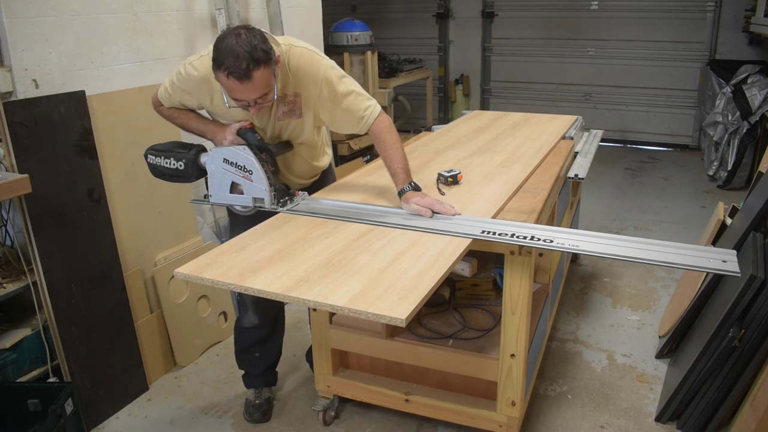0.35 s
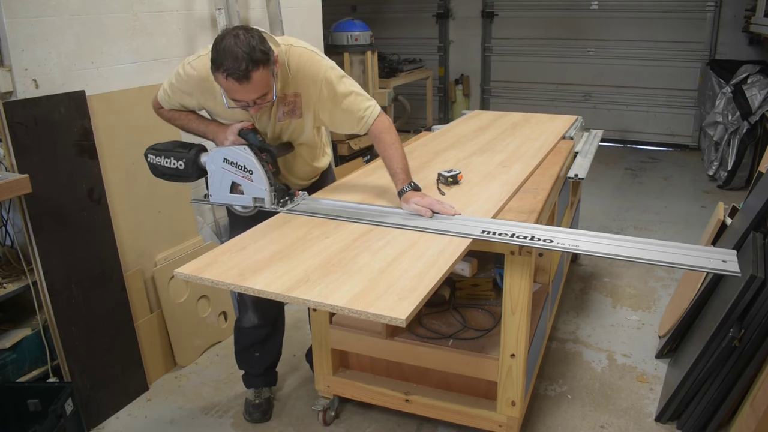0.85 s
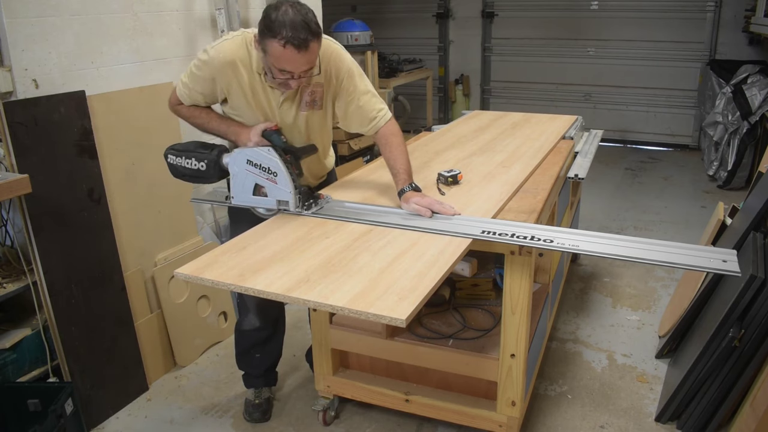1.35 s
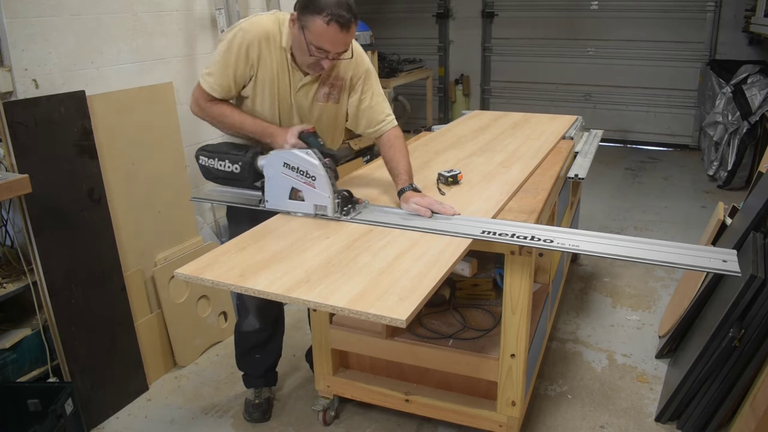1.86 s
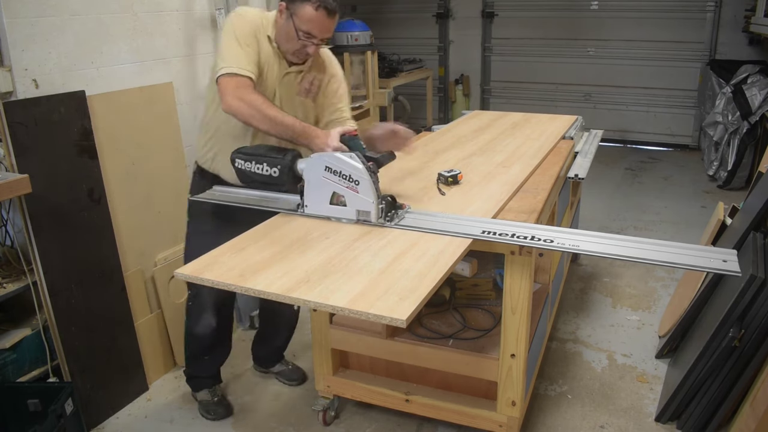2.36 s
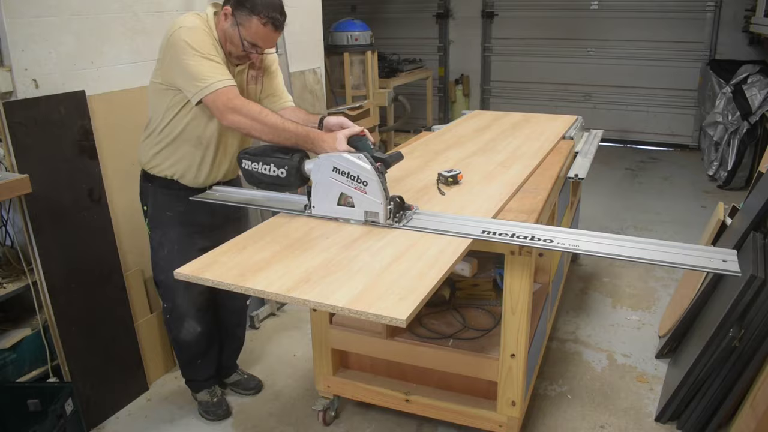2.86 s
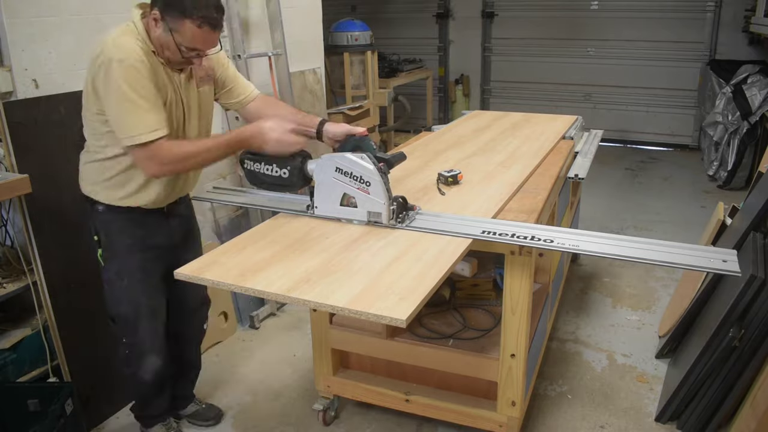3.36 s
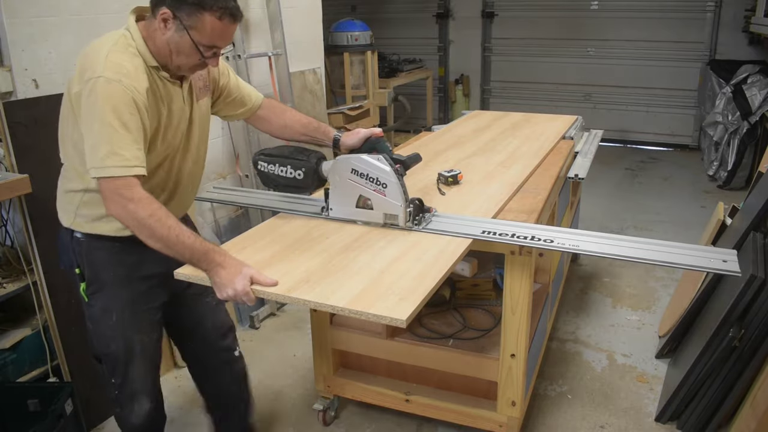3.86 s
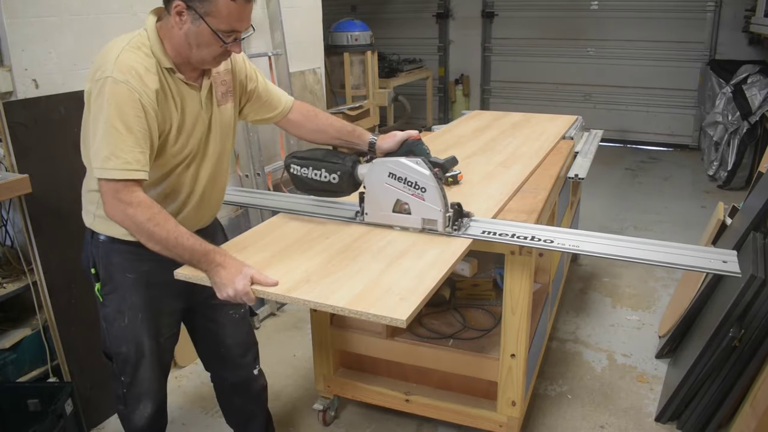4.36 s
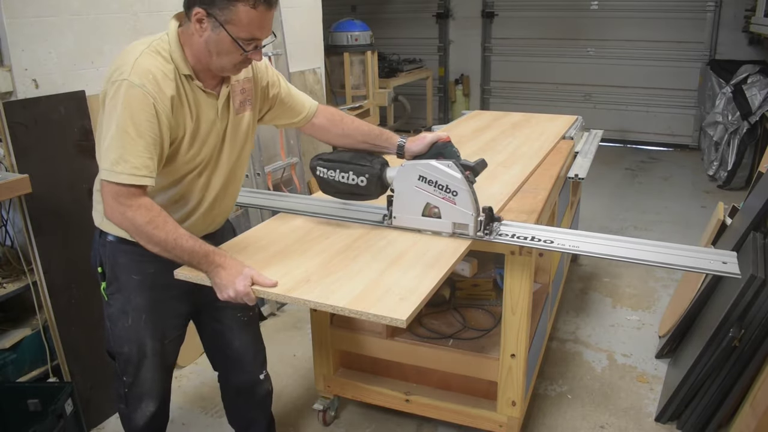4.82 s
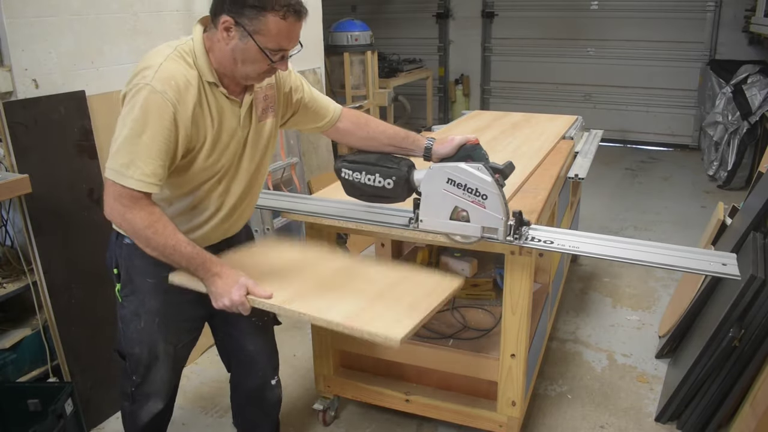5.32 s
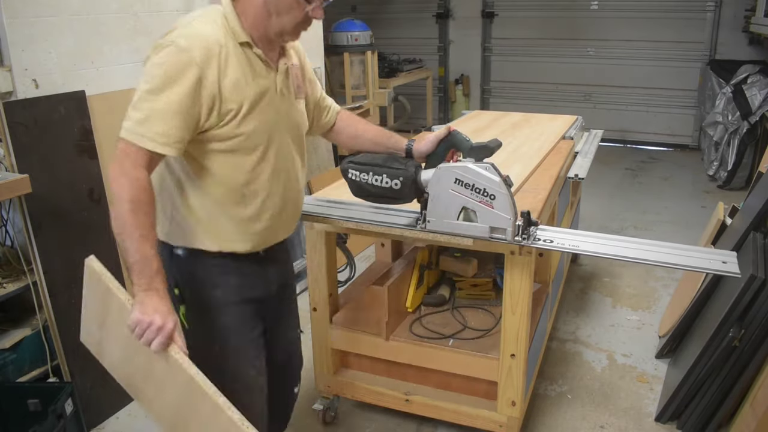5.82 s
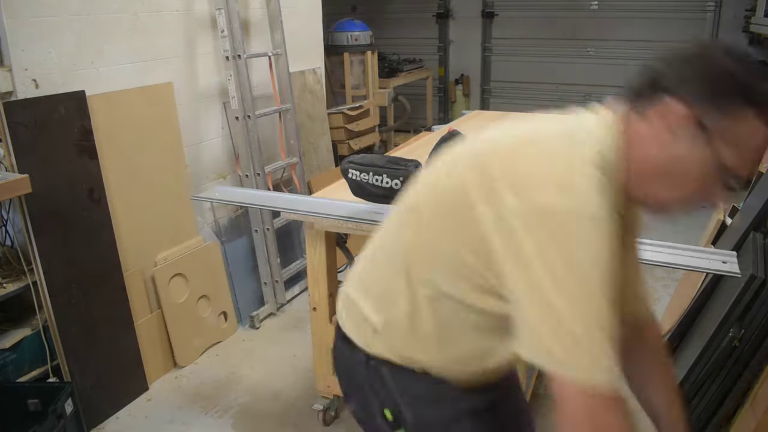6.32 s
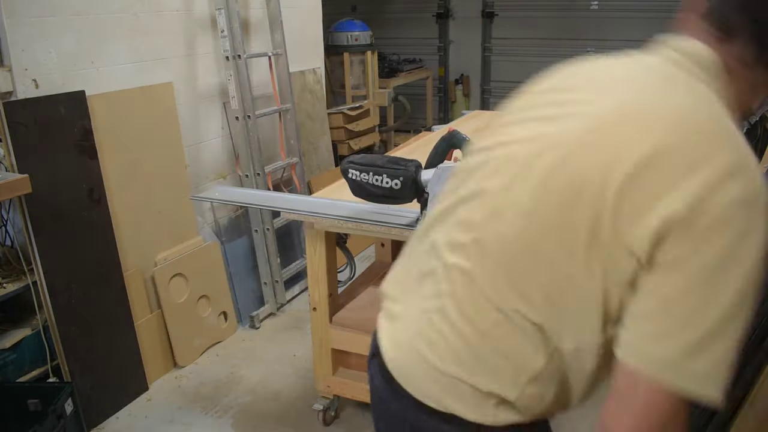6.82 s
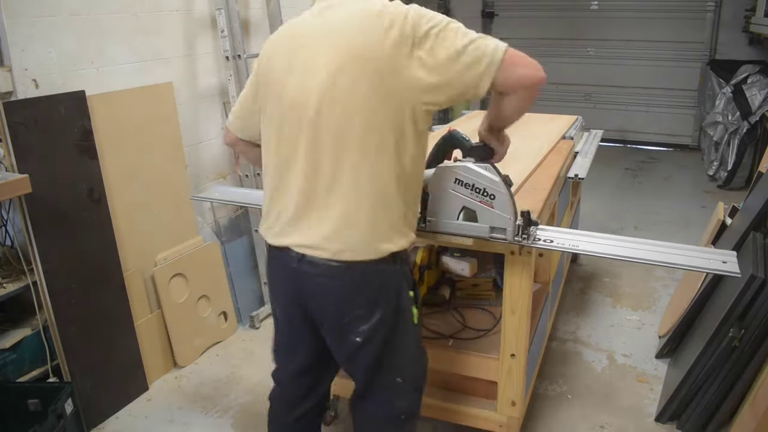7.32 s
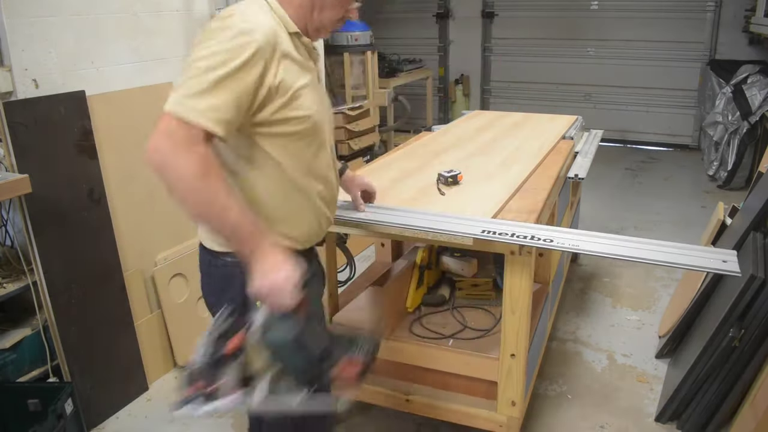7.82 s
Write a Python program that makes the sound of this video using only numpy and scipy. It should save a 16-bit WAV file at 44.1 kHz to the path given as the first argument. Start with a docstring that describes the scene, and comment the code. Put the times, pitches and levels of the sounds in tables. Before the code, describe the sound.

Loud, steady electric saw whine becomes a rougher, lower growl as teeth enter wood. A quick dip and recovery interrupts the cut; at the end the pitch rises again before a fast braked fall. A metallic ring lingers in the quiet garage workshop, a board smacks the floor, then cloth rustles, light ticks and hollow tool rattles sound softly. Centred pickup with little reverberation.

```python
"""A saw whines and roars as it runs free, then dips into a wooden panel and growls lower as it cuts.
It is braked and restarted once, finishes the cut and brakes to a stop; its blade rings on, the offcut meets the floor.
Then feet, clothes and tools scuff and tick in a quiet workshop. Whine, ring and knocks are made of sine tones;
roar, scuffs, ticks and air are shaped noise; small clacks are damped tones struck a few times.
Both channels carry the same sound."""
import sys
import numpy as np
from scipy import signal
from scipy.io import wavfile
from scipy.ndimage import uniform_filter1d

SR = 44100
rng = np.random.default_rng(int(sys.argv[2]) if len(sys.argv) > 2 else 0)


def wav_record(signal):
    """Record a signal, one row per channel, as 16-bit PCM in the file named by sys.argv[1]."""
    frames = np.transpose(np.atleast_2d(signal))
    bounded = np.clip(frames, -1, 1)
    # unit amplitude maps onto the largest positive 16-bit level
    quanta = np.round(bounded * 32767).astype(np.int16)
    wavfile.write(sys.argv[1], SR, quanta)


def nominal_scale(level):
    """Amplitude ratio for a level in decibels (scalar or array-like)."""
    x = np.asarray(level, float) / 20
    return 10 ** x


N = 360738

# motor speed while the trigger is held; the cut drags it down: time_s, armature_turns_per_s
SPEED = [(0.0, 1567), (0.3, 1573.5), (0.75, 1577), (1.36, 1577), (1.44, 1535), (1.58, 1396), (1.78, 1304),
         (1.98, 1222), (2.07, 1258), (2.27, 1293), (2.37, 1357), (2.57, 1414), (2.66, 1410), (3.06, 1520),
         (3.2, 1519), (3.36, 1449), (3.55, 1465), (3.65, 1418), (3.8, 1395), (3.95, 1328), (4.14, 1305),
         (4.24, 1321), (4.95, 1351), (5.15, 1378), (5.24, 1416), (5.33, 1494), (5.43, 1542), (5.65, 1558)]
# trigger let go, then pressed again: off_s, on_s
RELEASES = [(2.665, 2.815), (5.65, 9)]
BRAKE_HZ_PER_S, RESTART_S = 5700, .062  # speed lost per second of braking; time to win it back
LOAD_FROM_HZ, STALL_HZ = 1510, 1348  # armature speed below which load begins, and that of a full cut
BLADE_RATIO = .14983  # blade turns per armature turn
PLUNGE_S, WOOD_S, THROUGH_S = .23, 1.42, 5.31  # blade lowered, meets the wood, cuts through

# armature and gear tones: armature_multiple, free_level_db, full_cut_level_db
GEAR_TONES = [(1, -46.5, -67), (2, -57, -65), (3, -66, -75), (4, -45.5, -59), (6, -60, -68),
              (6.98, -72, -65), (7, -60, -52), (8, -55, -60), (9.98, -58, -70), (10, -42, -56)]
# the blade throbs in its slot: blade_multiple, light_cut_level_db, full_cut_level_db
THROB = [(2, -72.5, -84.5), (2.5, -98.5, -76.5), (3, -83.5, -77.5), (4, -76, -82.5), (5, -68, -74),
         (6, -86.5, -68), (7, -59, -74.5), (8, -75, -56.5), (9, -92, -72), (11, -82, -68.5), (12, -60, -80)]
# tooth tones: blade_multiple, level_over_roar_db, gain_while_speed_sags_db
TEETH = [(19, -27, 2), (21, -28, 6), (24, -30, 5), (33, -26, 5), (37, -27, 0), (39, -29, 0), (42, -23, -3)]
# blade resonances that lift the tooth tones: pitch_hz, width_hz, cut_start_lift_db, cut_end_lift_db
BITE = [(4150, 130, 17, -6), (7470, 130, 12, 12), (8000, 300, 14, 14), (8550, 300, 13, 12)]
# tones are lifted or sunk at these pitches; the last row is the upper edge of the sound:
# pitch_hz, width_hz, change_db
PASSING = [(1235, 50, 4), (1412, 20, 5), (1455, 30, -4), (5650, 250, 3), (1517, 14, 3), (1545, 16, 1),
           (1577.5, 4, 4.5), (1125, 70, -10), (1597, 14, -7), (385, 25, 7), (478, 16, -10), (2215, 40, 6),
           (2830, 40, 8), (3080, 70, 5), (1571.5, 2.5, -7), (3133, 14, 10), (6070, 90, -7), (6200, 110, 6),
           (6294, 20, -10), (8560, 250, 10), (9330, 160, 4), (9463, 50, 8), (10900, 150, 9),
           (11620, 120, 4), (12430, 150, 9), (12605, 110, 14), (14180, 200, 1), (14550, 250, -5),
           (15550, 300, 7), (15705, 50, 10), (15775, 60, -28)]
# coil whine while braking: armature_multiple, level_db
BRAKE_TONES = [(5.5, -49.5), (6.2, -61), (7, -57), (8, -62), (9.8, -57), (4.7, -59), (4, -60), (3.4, -61),
               (2.6, -64), (2.2, -64), (2, -60), (1.8, -63), (1.5, -66), (1, -66)]
# how strongly the brake tones sound: time_s, change_db
BRAKE_FORCE = [(2.9, -16), (5.6, 0)]
# the housing lifts the brake and restart tones here: pitch_hz, width_hz, lift_db
BRAKE_SING = [(7400, 900, 11)]
# gear tones while the motor spins up: armature_multiple, level_db
RESTART_TONES = [(7, -56), (7.6, -58), (8, -57), (4, -63), (10, -58)]
WOBBLE_DB, WOBBLE_CUT_DB = -71, -75  # blade imbalance, free and in a full cut
STRAIN_DB, STRAIN_HZ_PER_S = 2, 500  # in the cut, tones swell as speed sags; full swell at this fall

# roar over time: time_s, roar_level_db, howl_over_roar_db
ROAR = [(0.0, -36, -25), (0.18, -38, -34), (1.38, -35, -27), (1.55, -37, -11), (1.82, -37.5, -10),
        (1.9, -37, -10), (2.14, -37.5, -12.5), (2.61, -37.5, -10.5), (4.04, -38.5, -11), (4.27, -39, -8),
        (5.29, -38.5, -5), (5.34, -37.5, -25), (5.74, -38.5, -9), (5.84, -34.5, -16), (5.91, -48, -22),
        (5.96, -64, -22), (6.04, -100, -30)]
# noise colour running free: pitch_hz, level_per_hz_db
FAN = [(530, -52), (900, -27), (1450, -14), (1560, -9), (2320, -11.5), (3930, -7), (5120, -14), (6130, -8),
       (9900, -11), (11000, -7), (12300, -7), (13500, -10), (15800, -12)]
# noise colour of teeth in wood: pitch_hz, level_per_hz_db
CUT = [(530, -60), (900, -23.5), (1300, -15.5), (1470, -12), (1580, -5), (2520, -8.5), (3620, -0.5),
       (3930, -6), (4760, -6.5), (6000, -6.5), (7000, -1.5), (8370, -2.5), (10000, -4.5), (15800, -7)]
# blade and housing shaken by air and teeth: pitch_hz, width_hz, free_lift_db, cut_lift_db
SHAKEN = [(1820, 35, 2, 8), (1935, 50, 5, 2), (2200, 50, 3, 3), (2800, 80, 4, 3), (5380, 45, 1, 6),
          (5800, 60, 3, 3), (7440, 40, 5, 14), (7600, 60, 4, 8), (8140, 50, 3, 7), (8590, 45, 5, 10),
          (9260, 35, 5, 6), (10700, 110, 8, 5), (10900, 110, 6, 10), (14200, 60, 0, 9), (3020, 40, 4, 4),
          (3855, 45, 7, 0), (6170, 60, 3, 4), (8420, 40, 3, 7), (10230, 40, 3, 5), (11500, 50, 3, 4),
          (12300, 60, 2, 5), (13000, 50, 3, 4), (15350, 60, 3, 6)]
# part of the hiss altered by braking (a minus loss is a gain): pitch_hz, width_hz, loss_db
BRAKE_HISS = [(13500, 910, -0.5)]
# loudest blade modes: pitch_hz, width_hz, cut_start_level_db, cut_end_level_db
HOWL = [(3828, 48, -6, 2), (3900, 40, -4, -2), (3952, 45, -2, 1), (4040, 40, -1, -5), (4105, 60, 2, -3),
        (4220, 50, -5, -6)]
# noise colour of the low body rumble: pitch_hz, level_per_hz_db
RUMBLE = [(18, -42), (30, -2.5), (162, -32), (199, -13), (398, -6.5), (431, -14), (610, -11.5), (692, -7.5),
          (1300, -5.5), (1690, -22.5), (2860, -120)]
# housing buzz: pitch_hz, width_hz, free_lift_db, braked_lift_db
BUZZ = [(345, 28, 5, 25), (500, 30, 5, 33)]
CHOP, CHOP_BRAKED = 0.058, 0.098  # depth of the throb at each blade turn; braking adds the second
# rumble level against the roar, which it trails by the lag; the cut lowers it a little, the brake raises it
RUMBLE_DB, RUMBLE_CUT_DB, RUMBLE_BRAKE_DB, RUMBLE_LAG_S = -29, -2.5, 5, 0.053
SHUDDER_HZ, SHUDDER_DB = 750, 5  # below this armature speed the housing shudders

# the blade ringing on: pitch_hz, relative_level_db, fall_60db_s
RING = [(1820, -17, 0.59), (2130, -21, 1.14), (4780, -29, 1.6), (5845, 2.5, 1.05), (6530, -16, 0.73),
        (7790, -47, 5.0), (8300, -16, 0.75), (8500, -10, 0.47), (9000, -20, 0.38), (11400, -21, 0.46)]
RING_FROM_S, RING_TO_S, RING_DB = 5.83, 6.487, -45  # the level is added to every ringing tone

# ringing tones of the wooden panel: pitch_hz, relative_level_db, fall_90db_s
PANEL = [(158, -24, 0.8), (163, -10, 0.15), (218, -9, 0.086), (410, 0.5, 0.046), (535, -9, 0.11),
         (750, -6, 0.077), (645, -9.5, 0.18), (830, -10.5, 0.18), (1003, 6, 0.043), (1166, 2.5, 0.036),
         (1310, -6, 0.15), (1330, -9, 0.11), (1390, 2, 0.1), (1513, -11.5, 0.21), (1740, 0.5, 0.061),
         (1997, 2.5, 0.11), (2060, -5, 0.15), (2480, -7.5, 0.14), (2660, -17, .1), (2890, -23, 0.091),
         (3240, -9, .12), (3450, -10.5, 0.17), (3500, -13, 0.088), (4100, -16, .1), (4440, -16, .12),
         (5340, -11, .12)]
# the offcut drops free, later meets the floor: start_s, blow_db, hardness_hz, lowest_ringing_hz
BLOWS = [(5.315, -45, 750, 150), (5.383, -49, 1000, 220), (6.5623, -35, 4980, 60),
         (6.565, -39.5, 2960, 280), (6.575, -37.5, 4000, 280)]
SOFT_RISE_S = .005  # rise of a blow of hardness 1 kHz; harder ones rise much faster
CLATTER_DB, CLATTER_S, CLATTER_HZ = -3.5, 0.014, 2400  # dull burst in every blow: level, decay, top pitch

# small hard contacts: start_s, bright_level_db, dull_level_db
TICKS = [(2.83, -39, -52), (6.039, -62, -79), (6.085, -58, -75), (6.111, -71.5, -65), (6.153, -75, -58.5),
         (6.218, -67.5, -68), (6.352, -77, -62.5), (6.484, -65.5, -58), (6.55, -64, -56),
         (6.555, -33.5, -46), (6.649, -40, -53), (6.949, -77, -62), (7.111, -68, -68), (7.18, -60, -64.5),
         (7.249, -58.5, -54.5), (7.52, -67, -87), (7.647, -69, -68), (7.785, -66, -67), (7.869, -76, -67),
         (7.96, -65.5, -80), (8.014, -66.5, -72)]
FAINT_PER_S, FAINT_DB, FAINT_FROM_S = 3, -80, 6.1  # stray ticks: how often, lowest level, first time
# small hollow parts knock and rattle: start_s, level_db, pitch_hz, rattle_s
CLACKS = [(6.8, -70, 2200, .02), (6.828, -69.5, 1900, .03), (6.907, -72, 1800, .01),
          (7.005, -67, 1570, .03), (7.471, -64, 2180, .012), (7.533, -67, 2150, .02),
          (7.536, -64, 3270, .01), (7.629, -70, 880, .01), (7.79, -73, 2500, .015),
          (7.873, -56, 1730, .012), (7.886, -59, 755, .01), (7.915, -74, 1010, .015),
          (7.95, -56, 2290, .025), (8.014, -62, 3870, .008), (8.016, -69, 2100, .012),
          (8.135, -61, 695, .008)]
CLACK_CYCLES, RATTLE_PER_S = 6, 210  # cycles for a ring to fall to 37 %; contacts per second
# rubbing strokes: start_s, bright_level_db, dull_level_db, length_s
SCUFFS = [(6.072, -66, -93, 0.019), (6.485, -61, -64, 0.049), (6.557, -46.5, -48, 0.024),
          (6.887, -91, -81, 0.05), (6.975, -71.5, -72, 0.027), (7.114, -62, -66.5, 0.033),
          (7.248, -55.5, -68.5, 0.049), (7.453, -81, -69, 0.025), (7.538, -76, -79, 0.091),
          (7.688, -76, -81, 0.042), (7.78, -56.5, -70, 0.027), (7.874, -65.5, -74, 0.054),
          (7.937, -82.5, -85, 0.077), (8.129, -61.5, -65, 0.011)]
# rustle of clothes: time_s, level_db
RUSTLE = [(5.95, -68), (6.31, -81.5), (8.18, -87.5)]
# colour of the bright rubbing noise: pitch_hz, level_per_hz_db
BRIGHT = [(1180, -38), (2000, -7.5), (3360, -13), (4140, -10), (4470, -11), (8050, -1.5), (9240, -9),
          (13000, -15), (15800, -19.5)]
# colour of the dull rubbing noise: pitch_hz, level_per_hz_db
DULL = [(180, -39), (300, 7), (704, -0.5), (1030, -0.5), (1120, -1.5), (1690, -3), (3500, -1),
        (4550, -72.5), (7700, -120)]
# colour of the quiet room's air: pitch_hz, level_per_hz_db
AIR = [(12, -36), (20, -8), (107, -2.5), (130, -7), (162, -3.5), (276, -14.5), (1470, -28.5), (1840, -24),
       (2430, -33), (3040, -29), (15800, -51)]
AIR_DB = -73.5
# how long the room echoes: pitch_hz, fall_60db_s
ROOM = [(150, 0.38), (1000, 0.16), (4000, 0.14), (12000, 0.12)]


def whine():
    """Sine tones locked to armature and blade turns; the brake sings roughly while the speed drops."""
    t = np.arange(N) / SR
    hz, load = uniform_filter1d(speed_at(t), 500), load_at(t)
    blade_hz = BLADE_RATIO * hz
    braking, roar_db = uniform_filter1d(braking_at(t), 600), curves(ROAR, t)[0]
    spinning_up = np.clip(np.gradient(hz, t) / 1500 - 1, 0, 1)
    shiver = (.0003 + .001 * load + .028 * braking + .016 * spinning_up) * drift(count=1, width=2)[0]
    turns = np.cumsum(hz * (1 + shiver)) / SR

    # driven tones drop out just after the trigger is let go, and at low speed
    driven = (1 - uniform_filter1d(braking_at(t - .032), 1600)) * np.clip(hz / 250 - 4.2, 0, 1)
    sag = uniform_filter1d(-np.gradient(curves(SPEED, t)[0], t), 4000) / STRAIN_HZ_PER_S
    strain = np.sqrt(load) * np.clip(sag, -1, 1)
    strained = driven * nominal_scale(STRAIN_DB * strain)
    in_wood = between(t, WOOD_S, THROUGH_S)

    tones = []  # (multiple of armature turns, gain over time)
    for k, free_db, cut_db in GEAR_TONES:
        level_db = free_db + load * (cut_db - free_db) + passing_db(k * hz)
        tones.append((k, strained * nominal_scale(level_db)))
    for k, light_db, full_db in THROB:
        level_db = light_db + load * (full_db - light_db) + passing_db(k * blade_hz)
        tones.append((k * BLADE_RATIO, strained * (1 - braking) * in_wood * nominal_scale(level_db)))
    wobble_db = WOBBLE_DB + load * (WOBBLE_CUT_DB - WOBBLE_DB)
    tones.append((BLADE_RATIO, driven * between(t, PLUNGE_S, THROUGH_S) * nominal_scale(wobble_db)))

    # tooth tones swell where they cross a blade resonance
    done = done_at(t)
    bite = [(f, width, db + done * (end_db - db)) for f, width, db, end_db in BITE]
    for k, db, strain_db in TEETH:
        swell = np.sqrt(1 + in_wood * humps(bite, k * blade_hz))
        tones.append((k * BLADE_RATIO, driven * nominal_scale(roar_db + db + strain_db * strain) * swell))

    # each brake or restart tone is partly torn into hiss by a quick random gain
    torn_gains = [.7 * (1 + row) for row in drift(count=len(BRAKE_TONES), width=2)]
    brake_gain = braking * nominal_scale(curves(BRAKE_FORCE, t)[0]) * np.clip(hz / 500 - 1, 0, 1)
    restart_gain = spinning_up * np.clip(hz / 150 - 4.3, 0, 1)
    for rows, gain in ((BRAKE_TONES, brake_gain), (RESTART_TONES, restart_gain)):
        for (k, db), torn in zip(rows, torn_gains):
            sing = np.sqrt(1 + humps(BRAKE_SING, k * hz))
            tones.append((k, torn * gain * nominal_scale(db) * sing))

    flutter_db = 1.2 + 2.2 * load + 3 * braking  # cut and brake break the tones up
    out = np.zeros(N)
    for (k, gain), flutter in zip(tones, drift(count=len(tones), width=14)):
        sine = np.sin(2 * np.pi * (k * turns + rng.random()))
        out += np.sqrt(2) * gain * nominal_scale(flutter_db * flutter) * sine * (k * hz < 15780)
    return out


def roar():
    """Fan, gears and teeth as dense noise, chopped a little at each blade turn, with howl and body rumble."""
    t = np.arange(N) / SR
    roar_db, howl_db = curves(ROAR, t)
    depth = CHOP + CHOP_BRAKED * uniform_filter1d(braking_at(t - .08), 4000)
    blade_turns = BLADE_RATIO * np.cumsum(speed_at(t)) / SR
    chop = 1 + depth * np.sin(2 * np.pi * blade_turns)
    dense = chop * noise(roar_colour, size=2048, patchy_db=1.55)
    howl = nominal_scale(howl_db) * noise(howl_colour, size=1024, patchy_db=1.5)
    rumble_db = curves(ROAR, t - RUMBLE_LAG_S)[0] + RUMBLE_DB + RUMBLE_CUT_DB * load_at(t)
    rumble_db += RUMBLE_BRAKE_DB * uniform_filter1d(braking_at(t), 2000) + SHUDDER_DB * shudder_at(t)
    body = nominal_scale(rumble_db) * noise(rumble_colour, size=1024, patchy_db=2.0)
    return (t < ROAR[-1][0]) * (nominal_scale(roar_db) * (dense + howl) + body)


def roar_colour(hz, t):
    """Load turns fan noise into cutting noise; wood or load shakes the blade in a new way."""
    load = load_at(t)
    shake = np.where((t > WOOD_S) & (t < THROUGH_S), 1, load)
    peaks = humps([(f, width, free_db + shake * (cut_db - free_db)) for f, width, free_db, cut_db in SHAKEN], hz)
    loss_db = sum(db / (1 + (2 * (hz - f) / width) ** 4) for f, width, db in BRAKE_HISS)
    loss_db = uniform_filter1d(braking_at(t), 6) * loss_db
    return (1 - load) * read(FAN, hz) + load * read(CUT, hz) + 10 * np.log10(1 + peaks) - loss_db


def howl_colour(hz, t):
    """The howl slides to the lower blade modes as the cut goes on."""
    done = done_at(t)
    # halved here because 20 * log10 doubles it again
    modes = [(f, width, (db + done * (end_db - db)) / 2) for f, width, db, end_db in HOWL]
    return 20 * np.log10(humps(modes, hz))


def rumble_colour(hz, t):
    """The housing buzzes when free or braked; the bench shakes low under load."""
    load = load_at(t)
    braking = np.maximum(.7 * uniform_filter1d(braking_at(t), 20), shudder_at(t))
    modes = [(f, width, (1 - load) * free_db + braking * brake_db) for f, width, free_db, brake_db in BUZZ]
    return read(RUMBLE, hz) + 10 * np.log10(1 + humps(modes, hz)) - 18 * (1 - load) * (hz < 150)


def speed_at(t):
    """Armature turns per second: driven speed, less what the brake takes; a restart wins it back quickly."""
    driven = np.mean([curves(SPEED, t + c)[0] for c in np.arange(-.03, .031, .01)], 0)  # rounds the corners
    lost = 0
    for off, on in RELEASES:
        recovery = np.exp(-(np.maximum(t - on, 0) / RESTART_S) ** 1.2)
        lost = lost + BRAKE_HZ_PER_S * np.clip(t - off, 0, on - off) * recovery
    return np.maximum(driven - lost, 0)


def load_at(t):
    """Load 0-1, read from the speed, so slowing under the brake counts as load too."""
    return np.clip((LOAD_FROM_HZ - speed_at(t)) / (LOAD_FROM_HZ - STALL_HZ), 0, 1)


def braking_at(t):
    """1 while the trigger is off and the motor still turns."""
    return sum((t > off) * (t < on) for off, on in RELEASES) * (speed_at(t) > 100.)


def shudder_at(t):
    """Shudder 0-1, growing as the motor nears standstill."""
    return np.clip(4 * (1 - speed_at(t) / SHUDDER_HZ), 0, 1)


def done_at(t):
    """Share of the cut that is done, by time."""
    return np.clip((t - WOOD_S) / (THROUGH_S - WOOD_S), 0, 1)


def between(t, start, end):
    """1 from start to end, with 80 ms ramps inside."""
    return np.clip(np.minimum(t - start, end - t) / 0.08, 0, 1)


def passing_db(hz):
    """Lift or dip in dB of a tone as it passes hz."""
    return sum(db / (1 + (2 * (hz - at) / width) ** 2) for at, width, db in PASSING)


def blade_ring():
    """The blade rings on as fading sine tones that beat slowly, until the ring stops short."""
    t = np.arange(round((RING_TO_S - RING_FROM_S) * SR)) / SR
    ring = np.zeros(len(t))
    for hz, db, t60 in RING:
        beat = 1 + 0.29 * np.cos(2 * np.pi * hz * 0.00077 * (t - .13))
        ring += nominal_scale(db - 60 * t / t60) * np.sin(2 * np.pi * hz * t) * beat
    fade_in, cut_off = np.clip(t / 0.16, 0, 1), np.clip((t[-1] - t) / .003, 0, 1)
    out = np.zeros(N)
    add(out, RING_FROM_S, nominal_scale(RING_DB) * ring * fade_in * cut_off)
    return out


def panel():
    """Each blow rings the panel's modes, damped by hand and floor; soft blows reach only the low ones."""
    out, t = np.zeros(N), np.arange(SR // 2) / SR
    places = rng.uniform(-3, 2.4, (len(BLOWS), len(PANEL)))  # chance change of each mode, in dB
    for (s, blow_db, hard_hz, low_hz), place in zip(BLOWS, places):
        ring = np.zeros(len(t))
        for (hz, db, t90), p in zip(PANEL, place):
            reach = 1 / (1 + (hz / hard_hz) ** 4) / (1 + (low_hz / hz) ** 4)
            tone = np.sin(2 * np.pi * hz * (1 + 0.0059 * p) * t)  # the pitch shifts a little too
            ring += np.sign(p) * nominal_scale(db + p - 90 * t / t90) * reach * tone
        crack = 0.26 * np.exp(-t / 0.0011) * rng.standard_normal(len(t)) * (hard_hz / 5000) ** 2
        # modes too many to count, as one dull burst
        dull = signal.butter(2, [380, min(hard_hz, CLATTER_HZ)], "bandpass", fs=SR)
        burst = evened(signal.lfilter(*dull, rng.standard_normal(len(t))))
        clatter = nominal_scale(CLATTER_DB) * np.exp(-t / CLATTER_S) * burst
        rise = 1 - np.exp(-t / SOFT_RISE_S * (hard_hz / 1000) ** 2)
        add(out, s, nominal_scale(blow_db) * rise * (ring + crack + clatter))
    return out


def ticks():
    """Small hard contacts: noise bursts of a few ms."""
    burst, bright, dull = np.exp(-np.arange(600) / SR / 0.0035), np.zeros(N), np.zeros(N)
    chance, size = rng.random((N // 64, 2)).T  # one draw for every 64 samples
    faint = []
    for k in np.flatnonzero(chance < FAINT_PER_S * 64 / SR):
        if k * 64 > FAINT_FROM_S * SR:
            faint.append((k * 64 / SR, FAINT_DB + 8 * size[k], FAINT_DB + 8 * size[k - 1]))
    for s, bright_db, dull_db in TICKS + faint:
        add(bright, s, nominal_scale(bright_db) * burst)
        add(dull, s, nominal_scale(dull_db) * burst)
    return rub(bright, dull, patchy_db=2.0)


def clacks():
    """Small hollow parts: a few quick contacts ring one damped pair of tones each."""
    out, t = np.zeros(N), np.arange(SR // 12) / SR
    for s, db, hz, rattle in CLACKS:
        hit, size = rng.random((2, len(t)))
        contacts = (hit < RATTLE_PER_S / SR) * (t < rattle) * (2 * size - 1)
        contacts[0] = .6
        pair = np.sin(2 * np.pi * hz * t) + 0.49 * np.sin(2 * np.pi * 1.13 * hz * t)
        ring = np.exp(-t * hz / CLACK_CYCLES) * pair
        add(out, s, nominal_scale(db) * signal.fftconvolve(contacts, ring)[:len(t)])
    return out


def scuffs():
    """Grainy noise strokes that swell and fade quickly, over the rustle of clothes."""
    t, bright, dull = np.arange(SR // 3) / SR, np.zeros(N), np.zeros(N)
    for s, bright_db, dull_db, length in SCUFFS:
        fade = nominal_scale(-520 * np.maximum(t - length, 0))  # falls 520 dB per second once the stroke ends
        stroke = np.clip(0.12 + t / 0.014, 0, 1) * fade
        add(bright, s, nominal_scale(bright_db) * stroke)
        add(dull, s, nominal_scale(dull_db) * stroke)
    clothes = nominal_scale(curves(RUSTLE, np.arange(N) / SR)[0]) * (np.arange(N) > RUSTLE[0][0] * SR)
    rubbing = rub(bright + clothes, dull + 0.79 * clothes, patchy_db=5.5)
    return nominal_scale(0.65 * drift(count=1, width=3)[0]) * rubbing


def rub(bright, dull, patchy_db):
    """Small contacts and rubbing: a bright and a dull noise under their own envelopes."""
    bright_noise = steady_noise(BRIGHT, size=256, patchy_db=patchy_db)
    dull_noise = steady_noise(DULL, size=256, patchy_db=patchy_db)
    return bright * bright_noise + dull * dull_noise


def room_air():
    """The quiet room: steady, mostly low noise."""
    return nominal_scale(AIR_DB) * steady_noise(AIR, size=1024, patchy_db=2.0)


def room(x):
    """Sparse echoes of random sign, each band dying at its own speed."""
    taps = np.zeros(SR // 2)
    at = np.arange(200, SR // 2 - 20, 20)
    taps[at + rng.integers(0, 20, len(at))] = rng.choice([-1., 1.], len(at))
    hz, t, z = signal.stft(taps, SR, nperseg=256)
    tail = signal.istft(z * nominal_scale(-60 * t / read(ROOM, hz)[:, None]), SR, nperseg=256)[1]
    return signal.fftconvolve(x, tail / np.linalg.norm(tail))[:N]


def noise(colour, size, patchy_db):
    """Noise coloured by colour(hz, t) in dB, with equal power in every frame before drifting patches."""
    hz = np.fft.rfftfreq(size, 1 / SR)[:, None]
    t = np.arange(4 * N // size + 6) * size / 4 / SR
    real, imaginary, patches = rng.standard_normal((len(t), len(hz), 3)).T
    patches = uniform_filter1d(patches, size // 64, 0)
    patches = evened(uniform_filter1d(patches, 8192 // size, 1))
    gain = nominal_scale(colour(hz, t))
    gain = gain / np.sqrt(np.mean(gain ** 2, 0))
    z = (real + 1j * imaginary) * gain * nominal_scale(patchy_db * patches)
    return evened(signal.istft(z, nperseg=size, noverlap=3 * size // 4)[1][:N])


def steady_noise(points, size, patchy_db):
    """Noise whose colour stays the same throughout."""
    return noise(lambda hz, t: read(points, hz) + 0 * t, size, patchy_db)


def drift(count, width):
    """Slow random wandering of rms 1, one row a tone; a larger width wanders more slowly."""
    steps = uniform_filter1d(rng.standard_normal((N // 128 + 2, count)), width, 0)
    return [np.interp(np.arange(N) / 128, np.arange(len(steps)), evened(row)) for row in steps.T]


def humps(modes, hz):
    """Summed power at hz of resonances given as pitch_hz, width_hz, level_db."""
    return sum(nominal_scale(2 * db) / (1 + (2 * (hz - f) / width) ** 2) for f, width, db in modes)


def read(points, hz):
    """Reads a table by pitch, joining its points on a log-frequency axis."""
    f, value = np.transpose(points)
    return np.interp(np.log(hz + 1), np.log(f + 1), value)


def curves(rows, t):
    """Joins rows of time and values by straight lines."""
    s, *columns = np.transpose(rows)
    return [np.interp(t, s, c) for c in columns]


def evened(x):
    """Scales to rms 1."""
    return x / np.sqrt(np.mean(x ** 2) + 1e-20)


def add(mix, s, sound):
    """Mixes a sound in at time s, in seconds."""
    part = mix[round(s * SR):][:len(sound)]
    part += sound[:len(part)]


def scene():
    """Saw, panel and handling over the quiet room, the same in both channels."""
    tones, knocks, clicks = whine(), panel(), ticks() + clacks()
    echo = room(nominal_scale(-17) * tones + nominal_scale(-7.0) * knocks + nominal_scale(-4.5) * clicks)
    mono = tones + roar() + blade_ring() + knocks + clicks + scuffs() + echo + room_air()
    return np.array([mono, mono])


def roll_off(x):
    """The treble ends steeply here."""
    return signal.sosfilt(signal.butter(12, 16630, fs=SR, output="sos"), x)


def record(dry):
    """Turns the finished mix into the sound that is saved."""
    return roll_off(dry)


dry = scene()
out = record(dry)
wav_record(out)
```